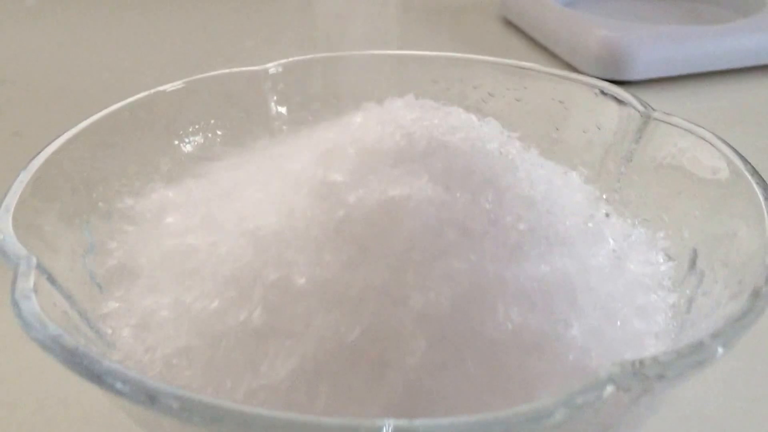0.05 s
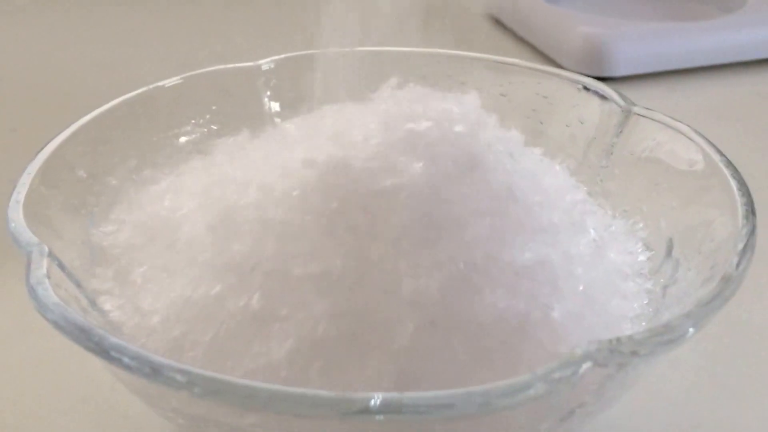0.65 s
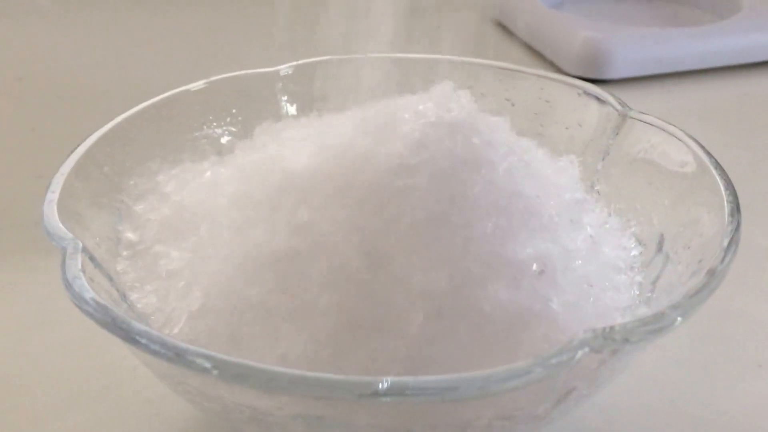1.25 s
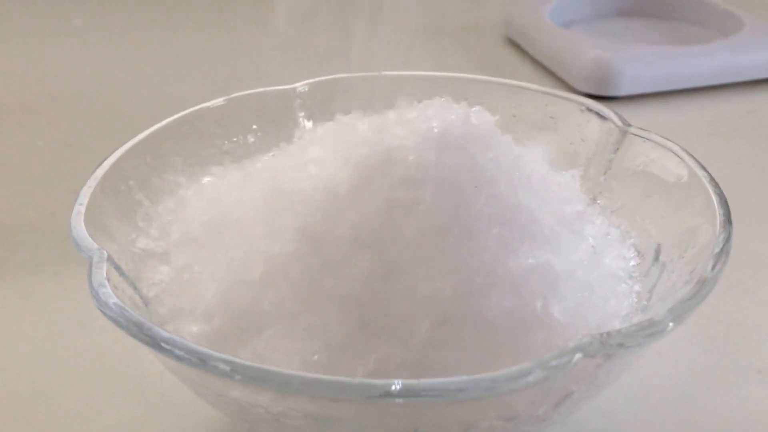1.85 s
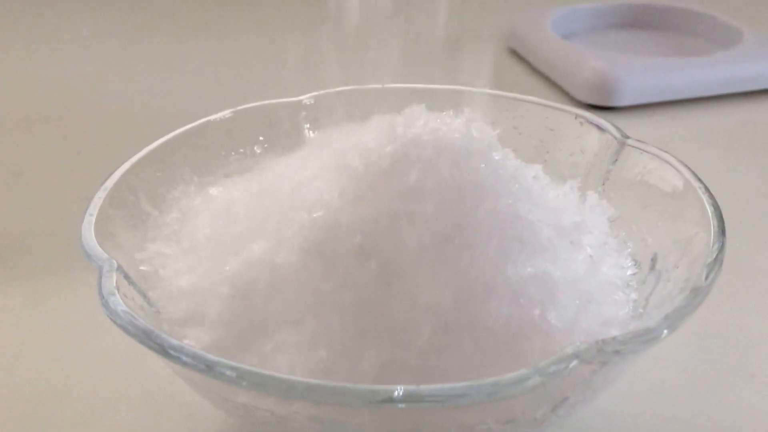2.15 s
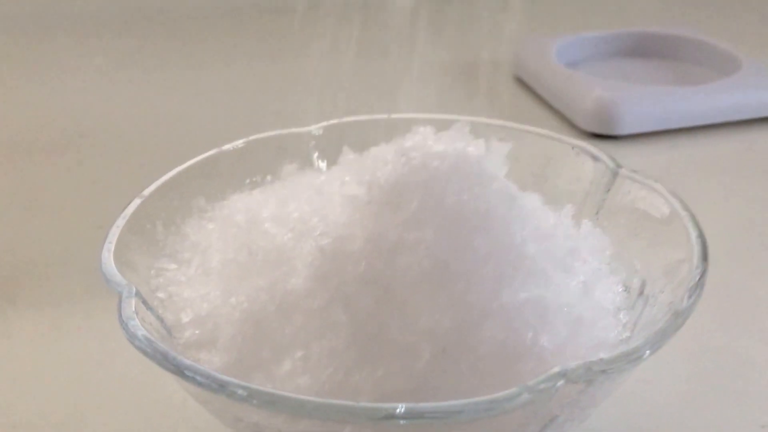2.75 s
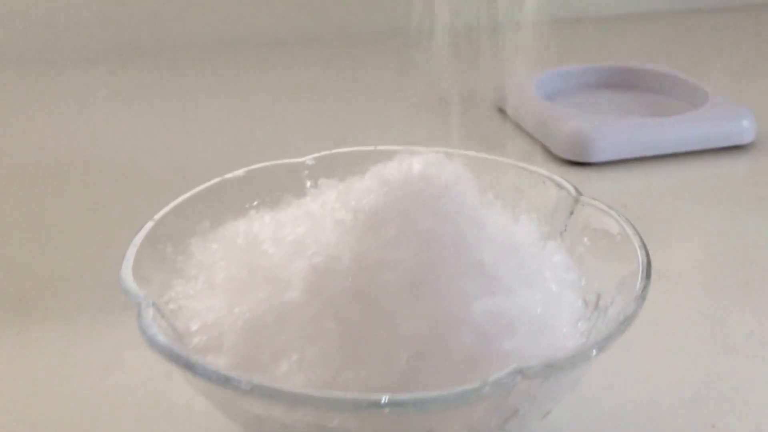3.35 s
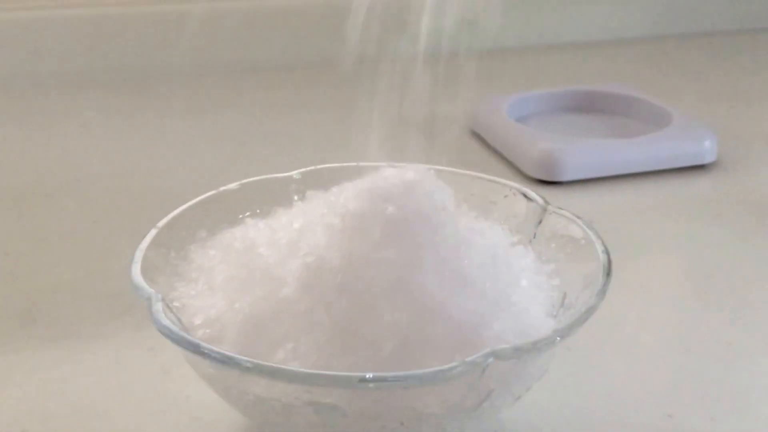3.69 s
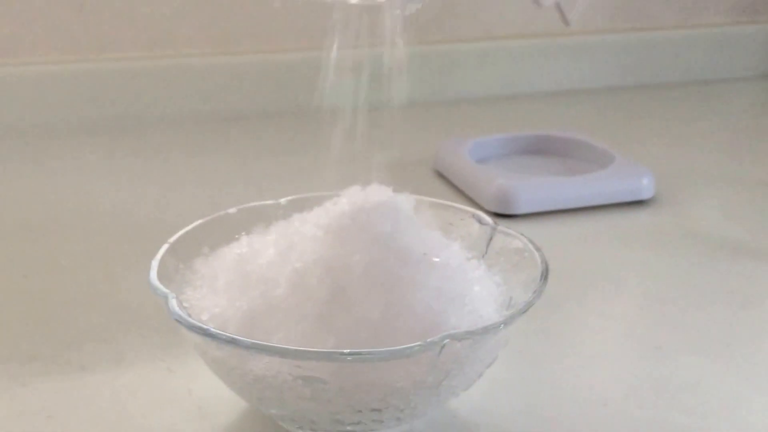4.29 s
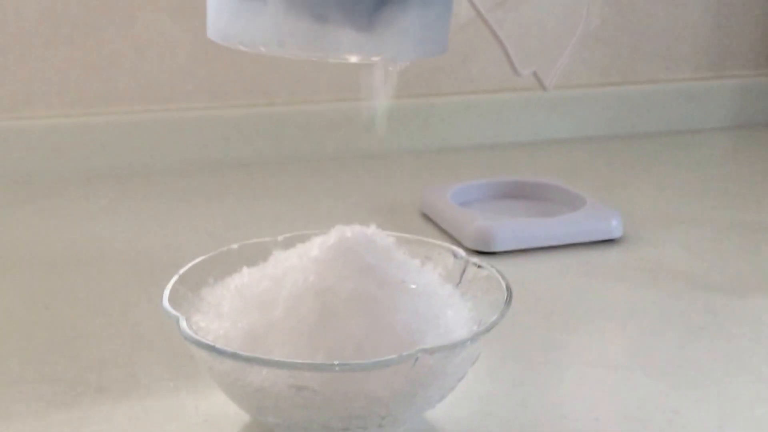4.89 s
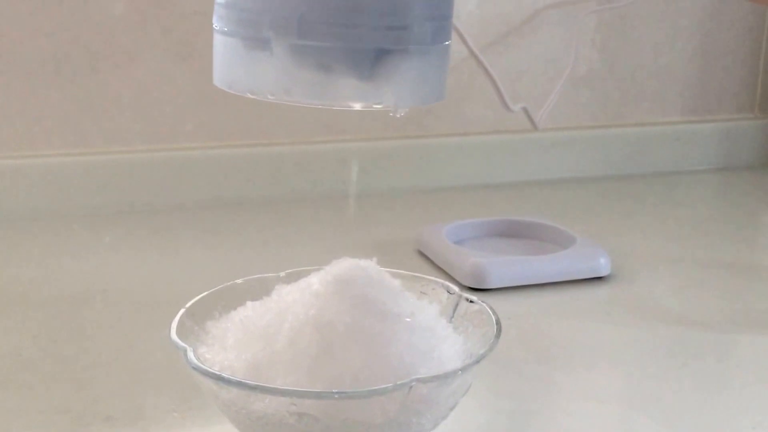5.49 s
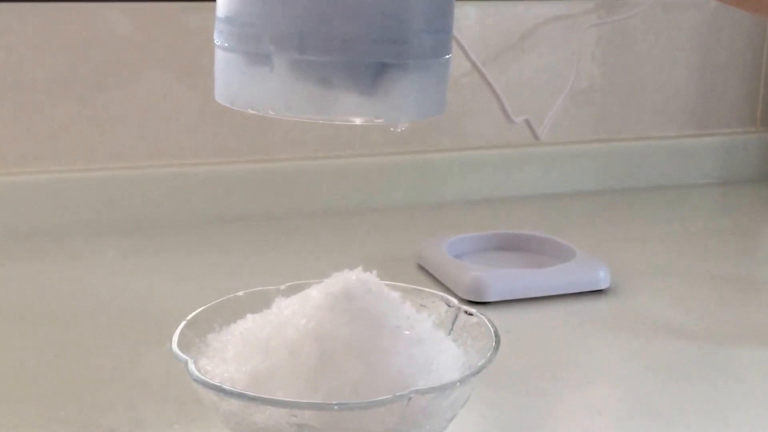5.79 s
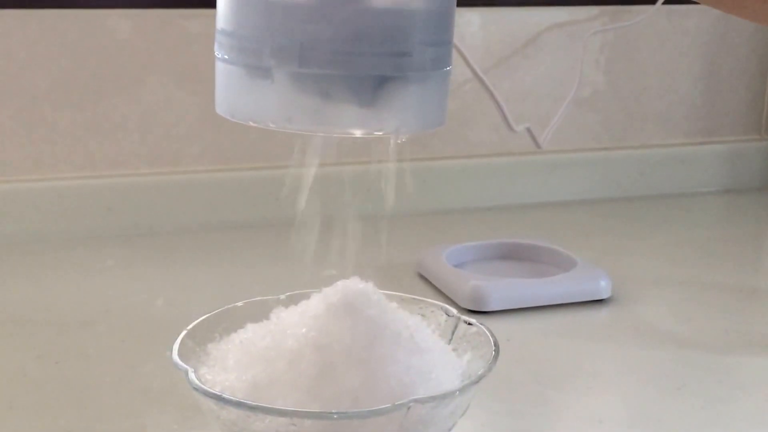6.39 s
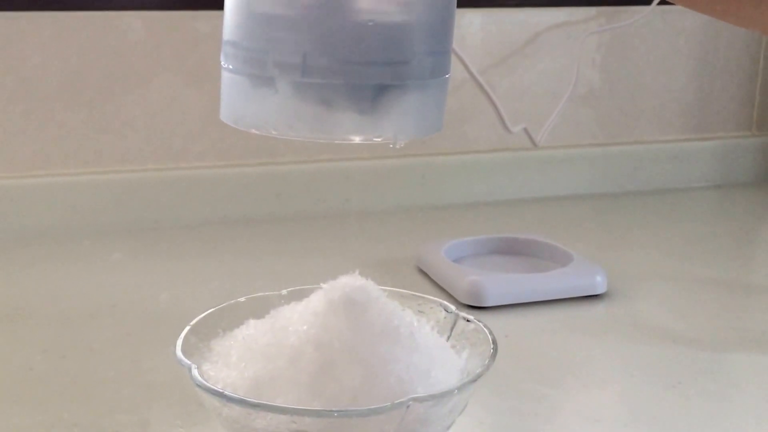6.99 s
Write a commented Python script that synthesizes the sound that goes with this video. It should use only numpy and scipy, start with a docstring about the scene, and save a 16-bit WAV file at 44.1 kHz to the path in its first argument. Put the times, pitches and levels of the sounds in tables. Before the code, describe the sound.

An electric ice shaver grinds loudly on a kitchen counter from start to finish. Ice crackles against the blade in quick, uneven surges while chunks rattle and knock on the plastic hopper, over a faint gear whine. Midway a thin, high scraping hiss comes forward. The grinding gradually thins as the ice is used up and the microphone backs away, with short kitchen echoes throughout.

```python
"""An electric ice shaver grinds over a glass bowl on a kitchen counter as the microphone backs away.
Its rotor drags ice over a blade in uneven strokes: the ice crackles at the blade (bite) and rattles
and knocks on the plastic hopper wall (chatter), and both ring through the housing. Behind them sit
a thin scraping sheen, a faint gear whine, a low worktop boom and short kitchen echoes.
The grinding thins out as the ice is used up."""
import sys
import numpy as np
from scipy import signal
from scipy.fft import rfft, irfft, next_fast_len
from scipy.io import wavfile

SR = 44100
rng = np.random.default_rng(int(sys.argv[2]) if len(sys.argv) > 2 else 0)


def inscribe(sig):
    """Save sig as 16-bit PCM at rate SR to the path in sys.argv[1].

    A 1-D sig is mono; a 2-D sig holds one channel per row.
    Samples are clipped to [-1, 1] before scaling.
    """
    pcm = np.round(np.clip(np.atleast_2d(sig).T, -1, 1) * 32767)
    wavfile.write(sys.argv[1], SR, pcm.astype(np.int16))


N = 319284
TIME = np.arange(N) / SR
CHATTER, BITE = 0, 1

# a chunk snaps free and hits the wall: t/s, relative chatter level/dB, relative bite level/dB
CHUNK_KNOCKS = [(0.101, -3.5, -18), (0.492, -13, -16.5), (0.5639, -8.5, -18), (0.6317, -8.5, -24),
                (0.795, -13, -20.5), (1.069, -8.5, -27), (1.323, -17, -21.5), (1.658, -7, -20),
                (1.6955, -12.5, -20), (1.978, -29, -19.5), (2.1604, -8, -30), (2.2305, -2, -15.5),
                (2.237, -12, -21), (2.5119, -9.5, -20.5), (2.799, -6.5, -15.5), (2.8417, -12.5, -20.5),
                (3.0944, -13.5, -24), (3.2561, -7, -19), (3.3764, -9, -23), (3.408, -11, -26),
                (3.7426, -12.5, -36), (3.7854, -8, -17.5), (3.8894, -10.5, -17.5), (4.0536, -11, -22.5),
                (4.0932, -9, -23), (4.187, -12.5, -22.5), (4.2784, -16, -31), (4.3451, -9.5, -22.5),
                (4.403, -6, -17), (4.415, -10, -25), (4.427, -9.5, -24.5), (4.6423, -12, -23.5),
                (4.8092, -22, -28.5), (4.875, -15, -38), (5.0631, -18, -28.5), (5.0898, -19, -23),
                (5.139, -18, -20), (5.234, -9.5, -40), (5.704, -17, -21.5), (5.8957, -9.5, -25.5),
                (5.9057, -21, -22), (6.1199, -10, -19), (6.4221, -13.5, -41), (6.4845, -14.5, -27),
                (6.9723, -16, -25.5), (7.2171, -4, -19.5)]
# the microphone backing away: t/s, position (0 close, 1 halfway, 2 far)
MIC_PATH = [(1.7, 0.2), (3.2, 0.62), (4.3, 1.24), (4.9, 1.67), (6.0, 2.03)]


def gain_of(db):
    """Decibels to amplitude."""
    return 10 ** (np.asarray(db) / 20)


def unit_rms(x):
    """Scales to rms 1."""
    return x / np.sqrt(np.mean(x ** 2) + 1e-20)


def add(mix, start_s, sound):
    """Lays a sound into the mix."""
    part = mix[max(round(start_s * SR), 0):][:len(sound)]
    part += sound[:len(part)]


def wander(rate_hz):
    """Random drift of rms 1, mostly slower than rate_hz."""
    size = next_fast_len(N)
    hz = np.fft.rfftfreq(size, 1 / SR)
    spectrum = rfft(rng.standard_normal(size)) / (1 + (hz / rate_hz) ** 2)
    return unit_rms(irfft(spectrum, size)[:N])


def resonate(x, gain):
    """Minimum-phase filter with the given gain from 0 Hz to SR / 2: it rings only after each blow."""
    log_gain = np.log(np.maximum(np.r_[gain, gain[-2:0:-1]], 1e-4))
    response = np.fft.ifft(np.exp(np.conj(signal.hilbert(log_gain)))).real
    return signal.oaconvolve(x, response)[:N]


def struck_mode(hz, t60, rise_s=0.00033):
    """One decaying sine whose envelope peaks at 1."""
    t = TIME[:SR // 8]
    envelope = (1 - np.exp(-t / rise_s)) * gain_of(-60 * t / t60)
    return envelope / envelope.max() * np.sin(2 * np.pi * hz * t)


def kitchen(x, early_db=-11.5, early_s=0.0081, echoes_per_s=1500, tail_db=-15.5):
    """Quick echoes off counter and tiles, then a short tail."""
    # reverb time of the kitchen: f/Hz, t60/s
    decay_times = [(150, 0.13), (1000, 0.23), (4000, 0.037), (14000, 0.15)]
    t = TIME[:SR // 2]
    early = rng.standard_normal(len(t)) * (rng.random(len(t)) < echoes_per_s / SR)
    early *= np.exp(-t / early_s) * (t > .002)
    hz, age, spectra = signal.stft(rng.standard_normal(len(t)) * (t > .008), SR, nperseg=256)
    t60 = np.interp(hz, *np.transpose(decay_times))[:, None]
    tail = signal.istft(spectra * gain_of(-60 * age / t60), SR)[1][:len(t)]
    room = (t == 0) + gain_of(early_db) * early / np.linalg.norm(early)
    room += gain_of(tail_db) * tail / np.linalg.norm(tail)
    return signal.oaconvolve(x, room / np.linalg.norm(room))[:N]


def worktop_boom(boom_hz=78, width_hz=30, boom_db=-31.5, fade_db=-4.0):
    """Chunks jolting the hopper shake the worktop, which booms faintly, most of all up close."""
    hz = np.fft.rfftfreq(N, 1 / SR)
    nearness = gain_of(fade_db * np.interp(TIME, *np.transpose(MIC_PATH)))
    jolts = rfft(rng.standard_normal(N) * rotor_pressure(CHATTER) * nearness)
    resonance = unit_rms(1 / (1 + ((hz - boom_hz) / width_hz) ** 4))
    return gain_of(boom_db) * irfft(jolts * resonance, N)


def gear_whine(waver=.009, waver_hz=39.6, flutter=1.0, flutter_hz=98, ease=.45):
    """Gear tones waver together under uneven load and ease when the ice lifts; worn teeth add grit."""
    # motor and gear tones: f/Hz, level/dB
    tones = [(415, -56), (1186, -52), (1696, -42.5), (2078, -55), (3795, -56)]
    motor_time = np.cumsum(1 + waver * wander(waver_hz)) / SR
    whine = np.zeros(N)
    for hz, db in tones:
        grit = 1 + flutter * np.tanh(wander(flutter_hz))
        whine += gain_of(db) * unit_rms(np.sin(2 * np.pi * hz * motor_time) * grit)
    return whine * gain_of(ease * lift_db())


def sheen(burst_db=12.0, burst_hz=60, fuzz_hz=300):
    """The scraping sings in thin, fuzzy bursts with the bite, rising as the ice gets smaller."""
    # glide of the singing band: t/s, f/Hz, level/dB relative to the bite
    glide = [(2.601, 6350, -24), (3.702, 6830, -5.5), (4.402, 6760, -11), (4.901, 6970, -5),
             (5.5, 7350, -13), (7.2, 7100, -24)]
    times, hz, db = np.transpose(glide)
    phase = 2 * np.pi * np.cumsum(np.interp(TIME, times, hz)) / SR
    fuzz = wander(fuzz_hz) * np.cos(phase) + wander(fuzz_hz) * np.sin(phase)
    bursts = gain_of(burst_db * np.tanh(wander(burst_hz)))
    return gain_of(np.interp(TIME, times, db)) * rotor_pressure(BITE) * unit_rms(fuzz * bursts)


def ringing(buzz=0.7, buzz_hz=300, detune=0.067, spread_db=7.0, bump_t60_s=0.036):
    """Knocks ring housing and ice differently each time, bumps sound one low note; loose parts buzz."""
    # hollow plastic, ice cube, glassy chip: f/Hz, level/dB relative to the knock, t60/s
    modes = [(2063, -16.5, 0.048), (3220, -18, 0.036), (7080, -18, 0.02)]
    # a heavy chunk drops in the hopper with a hollow bump: t/s, f/Hz, level/dB before the buzz
    bumps = [(0.103, 374, -17), (2.653, 470, -21.5), (7.22, 346, -23)]
    out = np.zeros(N)
    for start, knock_db, _ in CHUNK_KNOCKS:
        for hz, db, t60 in modes:
            pitch, strength = rng.uniform(-1, 1, 2)
            note = struck_mode(hz * (1 + detune * pitch), t60)
            add(out, start, gain_of(knock_db + db + spread_db * strength) * note)
    for start, hz, db in bumps:
        add(out, start, gain_of(db) * struck_mode(hz, bump_t60_s))
    return out * (1 + buzz * np.tanh(wander(buzz_hz)))


def housing(chatter, bite, wall_hz=2000, wall_log_width=0.47):
    """Chatter rings the hopper wall; the blade drives the rumble below it and the hiss above."""
    # resonances of housing and counter: f/Hz, width/Hz, level/dB from close, halfway and far
    resonances = [(74, 9, -13, -17.5, -19), (135, 55, 1, -4, -3.5), (285, 101, 5.5, 7, 7),
                  (374, 44, 4.5, 8, 12), (517, 121, 8, 8.5, 10.5), (690, 177, 3.5, 7, 8.5),
                  (959, 195, 4, 5.5, 12), (1281, 158, 11.5, 9, 7), (1380, 330, 7, 6.5, 6.5),
                  (1752, 242, 14, 10, 7), (1975, 110, 12, 16, 13.5), (2100, 213, 11.5, 18.5, 15),
                  (2583, 700, 11, 11, 8), (3340, 390, -27.5, 7, 7), (3704, 410, 13.5, 1.5, 10),
                  (4215, 760, 3.5, 6, 2.5), (5334, 470, 9, 8, 9), (6135, 740, 11, 7.5, 0),
                  (6570, 730, -7.5, 3, 6.5), (7610, 1000, 6, 1, 2), (8880, 1670, 0.5, 0, -2.5),
                  (11940, 2500, -3.5, -3.0, -4.5), (14841.0, 2300, -7, -7.5, -8)]
    hz = np.fft.rfftfreq(4096, 1 / SR)
    wall_share = 1 / (1 + (np.log((hz + 1) / wall_hz) / wall_log_width) ** 6)
    mic_position = np.interp(TIME, *np.transpose(MIC_PATH))
    out = np.zeros(N)
    for spot in range(3):
        power = sum(gain_of(db[spot]) ** 2 / (1 + ((hz - centre) / width) ** 2) ** 3
                    for centre, width, *db in resonances)
        wall = resonate(chatter, np.sqrt(power * wall_share))
        blade = resonate(bite, np.sqrt(power * (1 - wall_share)))
        crossfade = np.maximum(1 - abs(mic_position - spot), 0)
        out += crossfade * (wall + blade)
    return out


def lift_db():
    """The force dips smoothly each time the ice lifts off the blade."""
    # skips of the ice: centre t/s, half length/s, dip/dB
    skips = [(0.068, 0.0081, -8), (0.75, 0.017, -6), (1.1, 0.0047, -10), (1.46, 0.0058, -7),
             (1.75, 0.019, -5), (2.31, 0.022, -4), (2.726, 0.011, -6.5), (3.511, 0.016, -5),
             (4.165, 0.0074, -4.5), (4.323, 0.0052, -5), (5.08, 0.008, -6), (4.541, 0.033, -11),
             (4.789, 0.015, -9.5), (5.55, 0.016, -8.5), (6.001, 0.0091, -7), (6.204, 0.018, -6),
             (7.07, 0.056, -3)]
    return sum(dip * np.exp(-.5 * ((TIME - centre) / half) ** 2) for centre, half, dip in skips)


def grinding_db():
    """The bed of steady grinding eases as the ice is used up and ducks in the skips."""
    # load of ice on the rotor: t/s, chatter level/dB
    load = [(0.0, -23.5), (1.3, -24), (2.6, -24.5), (4.2, -27.5), (5.6, -30), (7.24, -31)]
    return np.interp(TIME, *np.transpose(load)) + lift_db()


def rotor_pressure(layer, idle_bite_db=-5.0, grip_s=.017, release_s=0.0075):
    """Envelope of CHATTER or BITE: steady grinding plus strokes that build, hold and die away."""
    # the rotor presses a chunk across the blade: t/s, length/s, chatter level/dB, bite level/dB
    strokes = [(0.025, 0.041, -19.5, -29.5), (0.147, 0.079, -20.5, -27.5), (0.324, 0.049, -23, -27),
               (0.444, 0.05, -22, -31), (0.65, 0.067, -23, -30), (0.801, 0.023, -25, -35),
               (0.885, 0.063, -18, -25), (1.063, 0.016, -14.5, -17), (1.16, 0.16, -25.5, -29.5),
               (1.379, 0.059, -19.5, -24), (1.533, 0.048, -22.5, -26), (1.655, 0.067, -21, -25.5),
               (1.79, 0.078, -20.5, -27.5), (1.972, 0.02, -22, -24), (2.084, 0.066, -25.5, -29),
               (2.221, 0.073, -19.5, -27), (2.358, 0.049, -23.5, -37), (2.511, 0.07, -21, -25.5),
               (2.665, 0.034, -21, -30.5), (2.76, 0.15, -23.5, -32), (2.964, 0.059, -21, -25.5),
               (3.088, 0.026, -18, -24), (3.246, 0.034, -21, -26), (3.33, 0.11, -28, -31),
               (3.521, 0.095, -20.5, -25.5), (3.733, 0.022, -24, -34), (3.866, 0.025, -24, -26),
               (3.929, 0.095, -33, -30.5), (4.058, 0.086, -25.5, -31), (4.336, 0.021, -21, -24),
               (4.387, 0.037, -21, -34), (4.579, 0.086, -28, -33.5), (4.67, 0.062, -21, -25),
               (4.921, 0.05, -20.5, -28.5), (5.1, 0.034, -30, -30), (5.169, 0.069, -23.5, -28.5),
               (5.328, 0.052, -28, -32.5), (5.631, 0.056, -28.5, -31.5), (5.87, 0.039, -24.5, -28),
               (5.936, 0.035, -24.5, -27.5), (6.045, 0.07, -22, -27), (6.242, 0.051, -21.5, -27),
               (6.412, 0.031, -28, -28), (6.589, 0.045, -22.5, -28), (6.783, 0.031, -25.5, -30.5),
               (6.86, 0.046, -29, -32), (7.127, 0.04, -22.5, -27)]
    power = gain_of(grinding_db() + (idle_bite_db if layer == BITE else 0)) ** 2
    t = TIME[:SR // 3]
    for start, length, *db in strokes:
        swell = np.minimum(t / grip_s, 1) * np.exp(-np.maximum(t - length, 0) / release_s)
        add(power, start, (gain_of(db[layer]) * swell) ** 2)
    return np.sqrt(power)


def tumbling(shared_db=1.64, own_db=1.08, rate_hz=35):
    """Chunks tumble in the hopper, so wall and blade feel the force unevenly: a gain for each."""
    shared = shared_db * np.tanh(wander(rate_hz))
    return [unit_rms(gain_of(shared + own_db * np.tanh(wander(rate_hz)))) for _ in range(2)]


def sticking(dip_db=-1.5, stick_s=0.024):
    """Just before each big knock the chunk sticks fast and the scraping falters: a gain."""
    dip = dip_db * np.sin(np.pi * np.minimum(TIME[:SR // 16] / stick_s, 1))
    db = np.zeros(N)
    for start, *_ in CHUNK_KNOCKS:
        add(db, start - stick_s, dip)
    return gain_of(db)


def chips(per_s=18, wall_db=4.0, blade_db=0.5, spread_db=3.0):
    """Small pieces break off at random, ticking louder in hard grinding: rows like CHUNK_KNOCKS."""
    breaks = np.flatnonzero(rng.random(N) < per_s / SR)
    scatter = rng.uniform(-1, 1, (2, N))
    wall, blade = grinding_db()[breaks] + spread_db * scatter[:, breaks]
    return list(zip(TIME[breaks], wall + wall_db, blade + blade_db))


def knocks(wall_trim_db=-16.5, crack_db=-11.0, strain_db=-8.0, rap_hz=2050, detune=0.045, rap_q=5.2):
    """Strain builds at the blade, the ice cracks and crumbles, then raps the wall at a varying pitch."""
    lead_s, crumble_s, rap_s = .008, .0048, .0028
    t = TIME[:1500] - TIME[round(lead_s * SR)]
    scale = np.sqrt(.004 * SR)  # a knock's level is its power over 4 ms
    swell = np.exp(-abs(t) / crumble_s) * np.where(t < 0, gain_of(strain_db), 1)
    forces = np.zeros((2, N))
    for start, wall_db, blade_db in list(CHUNK_KNOCKS) + chips():
        crumbs = rng.standard_normal(len(t)) * swell / np.linalg.norm(swell)
        crunch = crumbs + gain_of(crack_db) * (t == 0)
        wall_mode = signal.iirpeak(rap_hz * np.exp(detune * rng.standard_normal()), rap_q, fs=SR)
        rap = signal.lfilter(*wall_mode, crunch * (t >= 0) * np.exp(-abs(t) / rap_s))
        for layer, db, hit in (CHATTER, wall_db + wall_trim_db, rap), (BITE, blade_db, crunch):
            add(forces[layer], start - lead_s, gain_of(db) * scale * hit / np.linalg.norm(hit))
    return forces


def contact_colour(forces, colour_db=3.0, patch_hz=380, patch_s=0.011):
    """Every crack lands on another spot, and so favours some resonances over others."""
    hz, t, spectra = signal.stft(forces, SR, nperseg=256, noverlap=192)
    patches = rng.standard_normal(spectra.shape[1:])
    for axis, steps in enumerate((patch_hz / hz[1], patch_s / t[1])):  # smear in frequency, then time
        patches = signal.lfilter([1], [1, -np.exp(-1 / steps)], patches, axis=axis)
    colour = unit_rms(gain_of(colour_db * np.clip(unit_rms(patches), -2, 2)))
    return signal.istft(spectra * colour, SR, nperseg=256, noverlap=192)[1][:, :N]


def fractures(per_s=2600, spread_db=3.0):
    """Random tiny cracks in the ice, mostly small and a few large; rms 1."""
    size = gain_of(spread_db * np.minimum(rng.exponential(1, N), 4))
    return unit_rms(size * rng.choice([-1, 1], N) * (rng.random(N) < per_s / SR))


def shaving(slip_db=2.0, slip_hz=150, hiss_db=-1.0, rub_db=-4.0):
    """The ice sticks and slips; each slip is a clump of cracks over the hiss of flakes peeling off."""
    slips = gain_of(slip_db * np.tanh(wander(slip_hz)))
    cracks = fractures()
    rub = gain_of(rub_db) * rng.standard_normal(N)
    hiss = gain_of(hiss_db) * rng.standard_normal(N)
    chatter = unit_rms((cracks + rub) * slips) * rotor_pressure(CHATTER)
    bite = unit_rms((cracks + hiss) * slips) * rotor_pressure(BITE)
    return np.array([chatter, bite]) * tumbling() * sticking()


def scene():
    """The shaver in the kitchen; the pattern of echoes shifts as the microphone moves."""
    chatter, bite = contact_colour(shaving()) + knocks()
    machine = housing(chatter, bite) + sheen() + gear_whine() + worktop_boom()
    spot_times, step_s = np.linspace(0, TIME[-1], 8, retstep=True)
    crossfades = [np.maximum(1 - abs(TIME - centre) / step_s, 0) for centre in spot_times]
    in_room = sum(kitchen(machine * fade) for fade in crossfades)
    return (in_room + ringing())[None]


def record(dry, low_cut_hz=48, ceiling=.75, high_cut_hz=15900):
    """The microphone drops the deep bass, the loudest peaks are rounded off and the top treble is cut."""
    thinned = signal.sosfilt(signal.butter(2, low_cut_hz, "high", fs=SR, output="sos"), dry)
    rounded = thinned / (1 + (thinned / ceiling) ** 6) ** (1 / 6)
    lowpass = signal.firwin(511, high_cut_hz, window=("kaiser", 9), fs=SR)
    return signal.oaconvolve(rounded, lowpass[None], "same")


dry = scene()
out = record(dry)
inscribe(out)
```